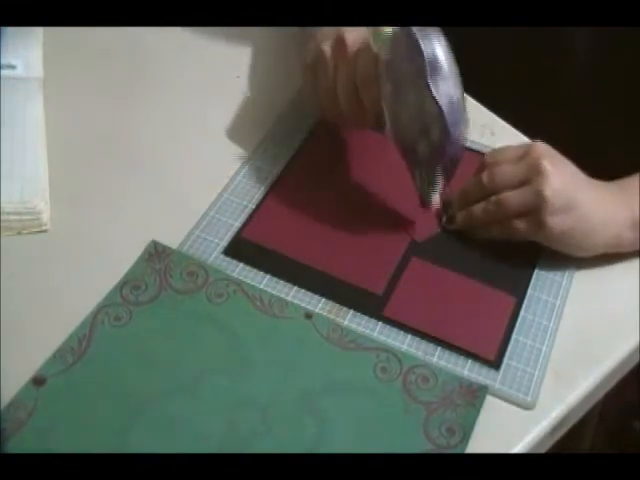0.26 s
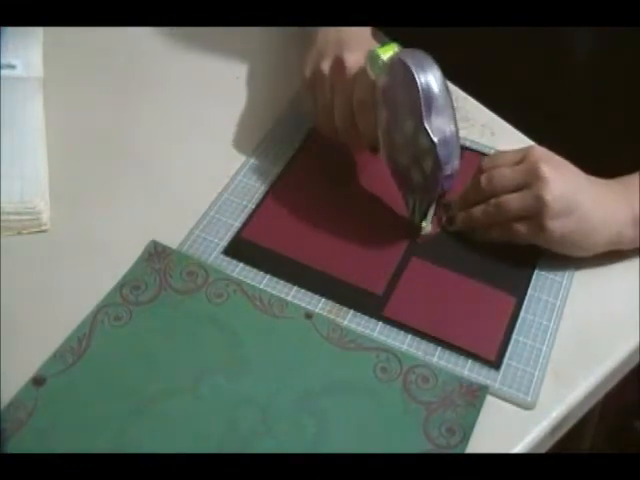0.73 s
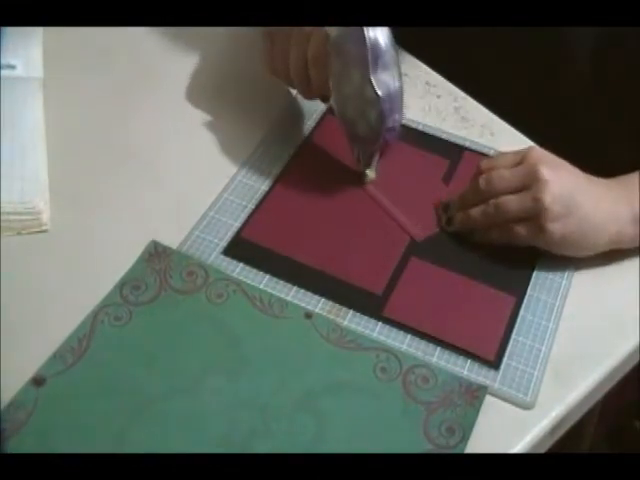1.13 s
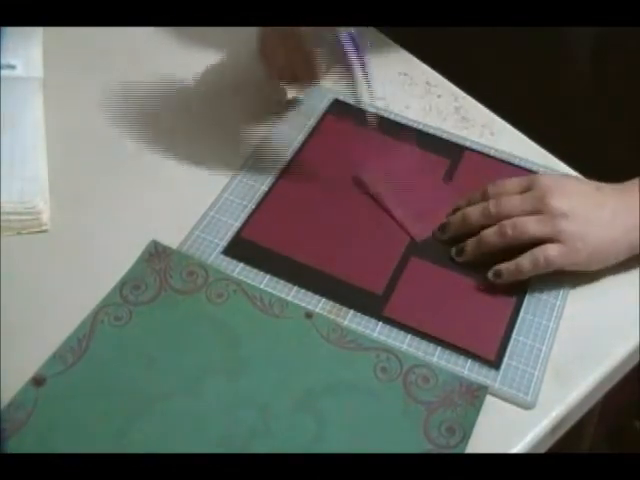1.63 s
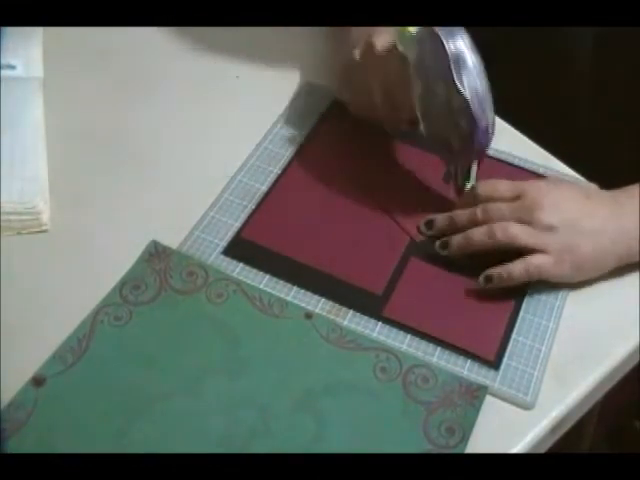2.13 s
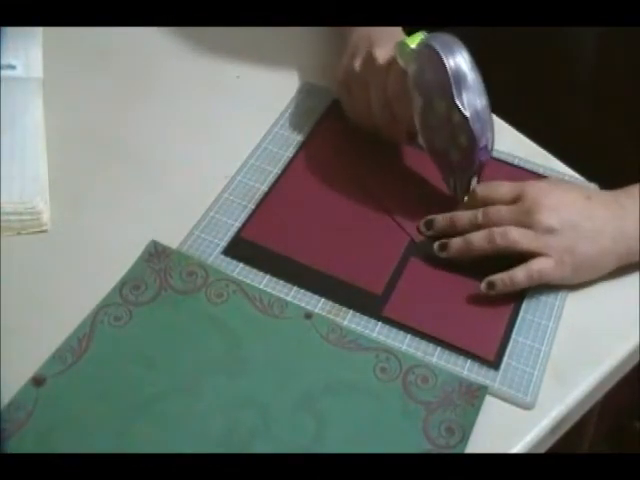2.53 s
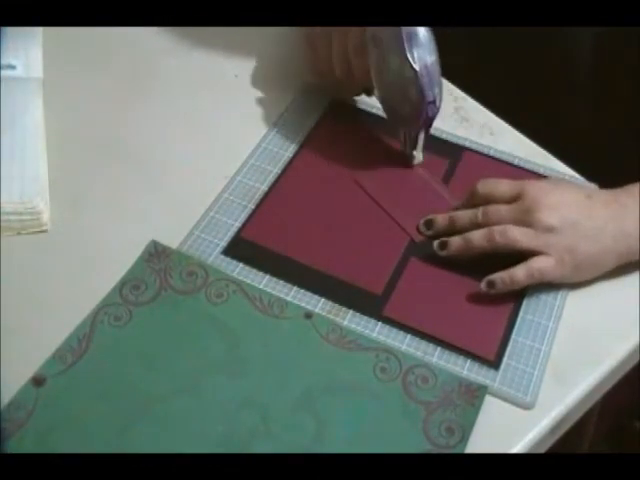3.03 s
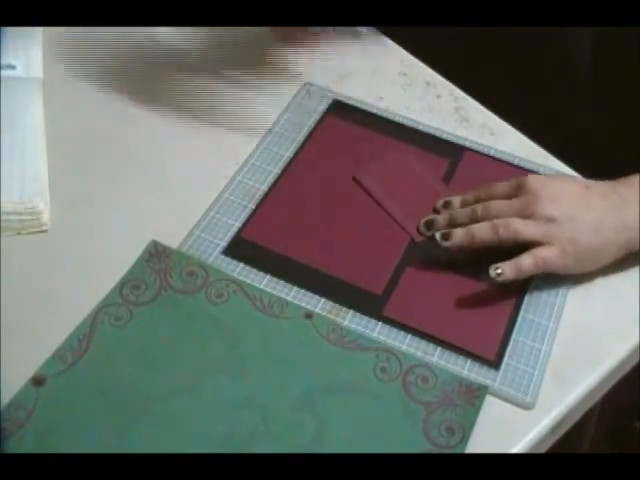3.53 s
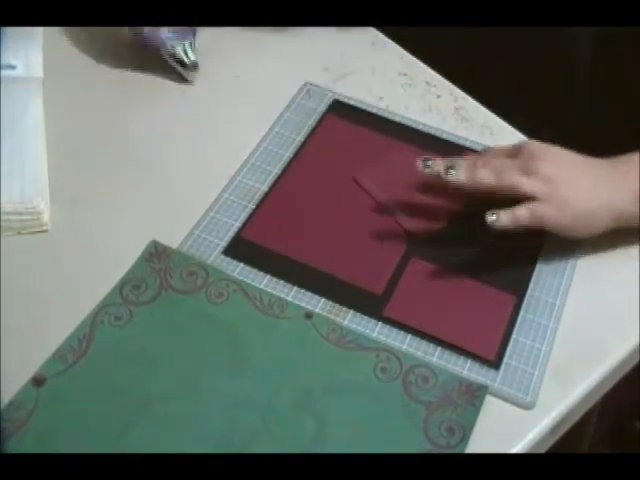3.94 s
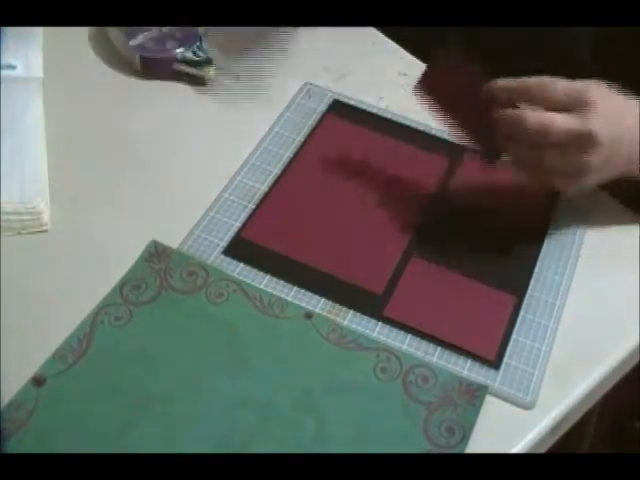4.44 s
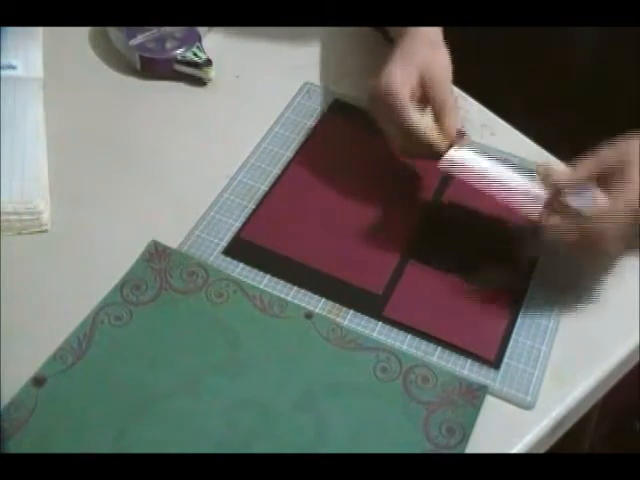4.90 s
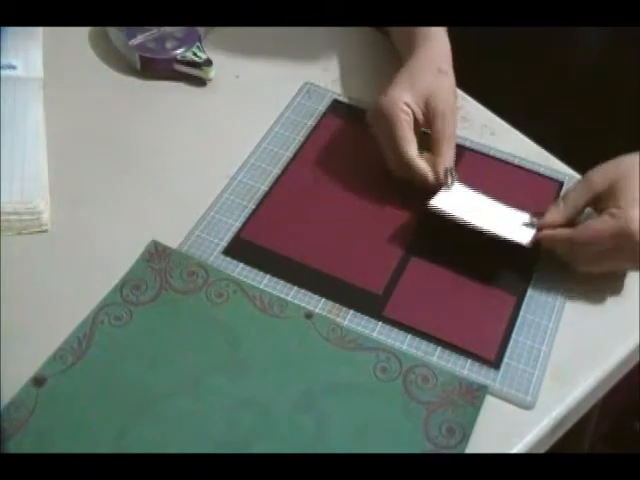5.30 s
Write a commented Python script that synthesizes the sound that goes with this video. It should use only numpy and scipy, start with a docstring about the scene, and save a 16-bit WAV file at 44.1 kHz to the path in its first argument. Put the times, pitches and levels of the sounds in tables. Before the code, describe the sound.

A small, quiet room with soft noise, a faint low hum beating about four times a second, and barely audible high, regular pips. Hands brush lightly on card from the start, with small ticks near 0.2 and 0.4 s. A soft double knock of plastic at 0.7 s leads into a tape pull from about 0.85 to 1.3 s: a gritty, ratcheting zip of rapid clicks with peel hiss, ending in a snap. A sharp plastic knock comes at 1.8 s, a tick at 2.25 and a double tap at 2.43. A faint squeak precedes the second, stronger pull, 2.8 to 3.2 s. Light rubs and ticks follow. From 4.0 to 4.4 s the runner clatters and scrapes onto the table, the loudest, hollow knocks slightly overloaded. A bright card snap at 4.65 s, then small ticks and rustles until a tiny squeak near 5.5 s. Close stereo, from the right.

```python
"""In a small room, a plastic tape runner is drawn twice over a piece of card on a cutting mat, then rocked and
put down on the table. Strokes are trains of stick-slip clicks that ring shell and table modes; single blows
ring the same modes as knocks. Filtered slips brush and rustle (hands on card, a stroke's first rasp);
ringing clicks snap and tick. Faint squeaks, leaning, motor and mains hum, timed pips and room noise lie around.
Two close microphone ports hear it from the right; the highest peaks overload them."""
import sys
import numpy as np
from scipy import signal
from scipy.fft import rfft, irfft
from scipy.io import wavfile

SR = 44100
rng = np.random.default_rng(int(sys.argv[2]) if len(sys.argv) > 2 else 0)


def dump_mix(stems):
    """Bounce the given channels to the path in sys.argv[1] as a 16-bit WAV at rate SR."""
    frames = np.atleast_2d(stems).T  # one column per channel
    limited = np.clip(frames, -1, 1)  # hard clip at full scale
    pcm = np.round(limited * 32767).astype(np.int16)
    wavfile.write(sys.argv[1], SR, pcm)


N = 245248

# Two tape strokes: t/s, pull level/dB, peel hiss over pull/dB (both before the layer trims)
STROKE_PULLS = [
    [(0.855, -49, -10), (0.895, -42, -3.5), (0.92, -46.5, -1.5), (0.972, -41, 0), (0.982, -33.5, -0.5),
     (1.025, -32.5, -2), (1.065, -34.5, -2.5), (1.115, -33, -9), (1.14, -36, 1), (1.195, -33, 1.5),
     (1.265, -48, -1.5), (1.3, -57, -6)],
    [(2.8, -52, -8), (2.83, -41.5, -8), (2.865, -39, -6), (2.92, -35.5, 0), (2.975, -27, -4),
     (3.005, -32.5, -4), (3.022, -37, 0.5), (3.05, -33, -3), (3.122, -37.5, -2.5), (3.15, -52.5, 1),
     (3.19, -65, 3)],
]
# Runner rocking and scraping: peak t/s, rise/s, fall/s, table rumble level/dB, shell level/dB, hiss level/dB
RUNNER_SLIDES = [(3.996, .003, .05, -68, -59, -56), (4.035, 0.012, 0.13, -51, -42, -41.5),
                 (4.1, 0.078, 0.12, -33.5, -29, -47.5), (4.175, 0.013, 0.084, -30.5, -57, -38.5),
                 (4.346, 0.045, 0.025, -26, -37, -38.5), (4.39, 0.028, 0.12, -28.5, -41.5, -38.5),
                 (4.435, 0.067, 0.036, -45, -72, -44)]
# Brushing and rustling, of hands on the card and of the rasp as the second stroke starts:
# peak t/s, rise/s, fall/s, dull rub level/dB, rustle level/dB, fine hiss level/dB
BRUSHING_SWELLS = [(0.05, 0.089, 0.19, -63, -57, -56.5), (0.165, .008, 0.092, -56, -55, -66),
                   (0.218, 0.099, 0.018, -46.5, -57, -55), (0.393, 0.026, 0.035, -47.5, -55.5, -52.5),
                   (0.73, 0.036, 0.12, -48, -67, -80), (0.76, 0.013, 0.027, -73, -58, -62),
                   (1.34, 0.093, 0.019, -71, -51, -49.5), (1.49, 0.061, 0.064, -78, -76, -52.5),
                   (1.72, 0.056, 0.024, -51.5, -53, -56), (1.83, 0.024, 0.028, -41.5, -46, -63),
                   (2.45, 0.016, 0.042, -42.5, -54, -56), (2.734, 0.087, 0.3, -57.5, -62, -83),
                   (2.835, 0.02, 0.055, -57, -40.5, -70), (3.298, 0.056, 0.15, -48.5, -62, -56.5),
                   (3.53, 0.044, 0.11, -46, -60, -56), (3.71, 0.084, 0.019, -55.5, -61, -54),
                   (4.645, 0.033, 0.013, -53, -53, -50), (4.68, 0.027, 0.053, -54, -50.5, -53),
                   (5.083, 0.011, 0.051, -75, -52, -67), (5.12, 0.09, 0.037, -73, -54, -57),
                   (5.32, 0.011, 0.085, -87, -63, -56), (5.38, 0.014, 0.024, -86, -58, -60)]
# Knocks of the runner: t/s, shell peak level/dB, table rms level/dB and crack rms level/dB (over 25 ms),
# table centre f/Hz, shell centre f/Hz, shell narrowness/(dB per octave squared), share of free ring time
RUNNER_KNOCKS = [(0.707, -38, -43.5, -70, 120, 750, 14, 0.95),
                 (0.715, -36.5, -42, -62, 132, 810, 3.5, 0.45),
                 (1.809, -52, -56, -42.5, 805, 2120, 15, 0.71), (1.8119, -19, -65, -43, 119, 1880, 28, 0.5),
                 (2.431, -29, -33.5, -45.5, 108, 830, 12, 0.88), (2.439, -31, -68, -70, 153, 754, 33, 0.93),
                 (4.018, -17, -26, -42, 296, 1080, 5, 0.8), (4.03, -20, -40, -55, 255, 750, 7, 0.4),
                 (4.059, -22, -29.5, -64, 258, 895, 3, 1), (4.1507, -9, -22, -32.5, 350, 760, 38, 0.28),
                 (4.163, -26, -24.5, -42.5, 231, 860, 20, 0.47),
                 (4.357, -9.5, -10.5, -30, 433, 1470, 19, 0.3), (4.395, -27, -20, -63, 397, 640, 5, 0.62)]
# Tape catching and letting go: t/s, shell peak level/dB, crack rms level/dB over 25 ms, shell centre f/Hz
TAPE_CATCHES = [(0.868, -31, -48, 970), (0.892, -26, -48, 1080), (0.934, -28, -50, 1080),
                (0.958, -27, -50, 1000), (0.979, -21, -39, 1040), (1.011, -23, -40, 1000),
                (1.024, -23, -42, 950), (1.137, -23, -38, 970), (1.187, -21.5, -38, 780),
                (1.219, -23, -45, 1000), (1.254, -28, -47.5, 870), (2.828, -27, -53, 900),
                (2.874, -21, -46, 950), (2.903, -27, -52, 850), (2.927, -18, -41, 900),
                (2.948, -20, -40, 1010), (2.974, -19, -41, 1040), (2.995, -23, -46, 1050),
                (3.039, -23, -43, 1080), (3.082, -21.5, -45, 980), (3.115, -24, -41, 1000)]
# Bright clicks, of card snaps and of sharp ticks at the second stroke's start and at runner knocks:
# t/s, peak level/dB, pitch f/Hz, rustle t60/s (at least 5 ms), ring over click/dB
BRIGHT_CLICKS = [(0.159, -30.5, 4070, 0.03, 3), (0.2112, -38, 2600, 0.02, 4), (0.392, -38.5, 3260, 0.2, -5),
                 (1.3202, -22, 1980, 0.015, -2), (2.2586, -29, 3300, 0.02, -5),
                 (2.821, -35, 3100, 0.05, -2), (2.843, -36, 3280, 0.04, -2), (3.67, -40, 1760, 0.079, -12),
                 (3.686, -25.5, 5450, 0.051, -12), (3.8283, -40, 2960, 0.16, -9),
                 (4.032, -30, 2850, 0.064, 1), (4.3982, -20.5, 2610, 0.052, -17),
                 (4.4247, -22, 2510, 0.017, 2), (4.625, -36.5, 2360, 0.028, -2),
                 (4.6564, -12, 3000, 0.013, -9.5), (4.664, -21.5, 2900, 0.045, -19),
                 (4.9885, -26.5, 2500, 0.051, -19), (5.081, -54, 1940, 0.26, 10),
                 (5.184, -40.5, 1520, 0.04, -4.5), (5.3613, -18.5, 1620, 0.02, -28)]
# Faint squeaks, one list per glide: t/s, pitch f/Hz, level/dB
SQUEAK_GLIDES = [
    [(2.69, 1180, -61), (2.745, 1156, -49.5), (2.8, 1070, -56)],
    [(2.68, 3100, -63), (2.72, 2840, -60), (2.77, 2680, -71)],
    [(5.525, 2960, -56), (5.54, 3500, -58), (5.556, 3380, -78)],
]
# An arm leaning on the table: peak t/s, rise/s, fall/s, level/dB
ARM_LEANS = [(0.15, 0.32, 0.24, -66), (1.14, 0.17, 0.14, -37.5), (1.58, 0.13, 0.083, -49.5),
             (1.72, 0.13, 0.086, -46.5), (2.15, 0.11, 0.049, -52.5), (3.03, 0.23, 0.19, -42.5)]
# Runner shell modes: f/Hz, relative level/dB, free t60/s
SHELL_MODES = [(664, -10, 0.034), (765, 0, 0.025), (872, 0.5, 0.055), (953, -1.5, 0.051),
               (1054, 5.5, 0.082), (1180, 7.5, 0.012), (1526, 13.5, 0.013), (1628, 14.5, 0.031),
               (1750, 9.5, 0.02), (2045, 11, 0.04), (2194, 10, 0.037), (2647, 21, 0.024),
               (2800, 20.5, 0.035), (3016, 18, 0.059), (3400, 15, 0.03)]
# Table top modes: f/Hz, relative level/dB, free t60/s
TABLE_MODES = [(65, -10, .15), (146, 2.5, .12), (170, -2, .11), (205, -3, .1), (232, 0, .1), (340, 0, .1),
               (395, 0, .07), (476, 0, .08), (528, -2, .07), (600, -2, .06), (700, -5, .05)]
# Colour of the peel hiss: f/Hz, relative level/dB
PEEL_COLOUR = [(760, -14), (1300, -8.5), (1710, -6), (2050, -3.5), (2880, -8.5), (3830, -12.5),
               (5830, -11.5), (7230, -9.5), (11000, -12.5), (14300, -10), (22000, -120)]
# Colour of the rustle and the scrape hiss: f/Hz, relative level/dB
RUSTLE_COLOUR = [(1200, 4.5), (1800, 6), (3000, 6), (5000, -5), (8000, -3), (11500, -11.5)]
# Colour of the dull rub: f/Hz, relative level/dB
RUB_COLOUR = [(400, -10), (700, 8.5), (950, 11), (1400, -2.5), (2000, -4)]
# Motor and mains lines: f/Hz, rms level/dB before the hum trim
HUM_LINES = [(58.01, -61), (116.03, -54), (120.03, -57), (179.73, -62), (232.8, -66)]
# Colour of the room noise: f/Hz, relative level/dB
AIR_COLOUR = [(15, -52), (25, -6.5), (118, -1), (160, -5), (401, -12), (1230, -22.5), (1510, -19),
              (2510, -25.5), (8100, -29.5), (11000, -31.5), (14300, -13), (22000, -120)]
# Likeness of the room noise in the two ports: f/Hz, likeness (held within 0.01 to 0.99 in use)
AIR_LIKENESS_CURVE = [(60, 0.88), (170, 0.87), (480, 0.72), (1370, 0.62), (3900, 0.32), (11100, -0.07)]
# Colour of direct sound at the left port: f/Hz, level/dB
LEFT_COLOUR = [(100, -1.5), (4500, -1.16), (7000, -7.5), (9500, -10), (11500, 1.5)]

LEFT_LAG_S = 5.5e-5


def strokes():
    """The tape peels in slips that shake the shell and, through the mat, the table; finer slips hiss."""
    walls_db, rasp_db, peel_db, rumble_db = -2.5, -8, 3, -13  # layer trims; the rasp follows the hiss
    on, spans = gains(STROKE_PULLS)
    pull = sum(o * from_db(db) for o, (db, _) in zip(on, spans))
    hiss = sum(o * from_db(db + over_db + peel_db) for o, (db, over_db) in zip(on, spans))
    peel = slips(per_s=2800, spread_db=2.0, clump_db=0.0)
    fine = slips(per_s=7600, spread_db=4.0, clump_db=1.0)
    walls = driven(from_db(walls_db) * pull, peel, SHELL_MODES[:6])
    rasp = driven(from_db(rasp_db) * hiss, peel, SHELL_MODES[7:])
    table = driven(from_db(rumble_db) * pull, peel, TABLE_MODES[1:3] + TABLE_MODES[5:8])
    return walls + rasp + hiss * rms_one(coloured(fine, closed(PEEL_COLOUR))) + table


def scrape():
    """Uneven contact of the rocking runner drives table and shell, over a more even hiss."""
    rumble, shell, hiss = swells(RUNNER_SLIDES)
    contact = slips(per_s=1600, spread_db=-2.0, clump_db=-1.0)
    fine = slips(per_s=12000, spread_db=3.5, clump_db=-2.0)
    bodies = driven(rumble, contact, TABLE_MODES) + driven(shell, contact, SHELL_MODES[:4])
    return bodies + hiss * rms_one(coloured(fine, closed(RUSTLE_COLOUR)))


def brushing():
    """Slips in three bands, a dull rub, a rustle and a fine hiss: hands on the card, and a stroke's first rasp."""
    resting_rub_db, resting_rustle_db, hiss_from_hz = -78, -70.5, 4730  # a hand stays on the card
    resting = from_db([[resting_rub_db], [resting_rustle_db], [resting_rustle_db]])
    rub, rustle, hiss = swells(BRUSHING_SWELLS) + resting
    fibres = slips(per_s=5000, spread_db=2.0, clump_db=2.5)
    crisp = coloured(fibres, closed(RUSTLE_COLOUR))
    low = signal.sosfilt(signal.butter(4, hiss_from_hz, "low", fs=SR, output="sos"), crisp)
    high = signal.sosfilt(signal.butter(4, hiss_from_hz, "high", fs=SR, output="sos"), crisp)
    dull = coloured(fibres, closed(RUB_COLOUR))
    return rub * rms_one(dull) + rustle * rms_one(low) + hiss * rms_one(high)


def knocks():
    """A blow strikes shell and table; where it lands picks the modes."""
    out, t = np.zeros(N + SR), np.arange(SR // 2) / SR
    for s, shell_db, table_db, crack_db, table_hz, shell_hz, narrow_db, ring_share in RUNNER_KNOCKS:
        force, crack = blow(t)
        # shell modes start against each other: a burst that swells
        shell = struck(force, SHELL_MODES, shell_hz, focus_db=narrow_db, ring_share=ring_share, sign=-0.88)
        # table modes start in step: a thud
        table = struck(force, TABLE_MODES, table_hz, focus_db=20.0, ring_share=ring_share, sign=0.89)
        bodies = from_db(shell_db) * shell + from_db(table_db) * head_one(table)
        add_at(out, s, bodies + from_db(crack_db) * crack)
    return out[:N]


def catches():
    """Each catch of the tape jolts the shell and cracks, leaving the table still."""
    out, t = np.zeros(N + SR), np.arange(SR // 4) / SR
    for s, shell_db, crack_db, shell_hz in TAPE_CATCHES:
        force, crack = blow(t)
        shell = struck(force, SHELL_MODES, shell_hz, focus_db=14, ring_share=.3, sign=-.4)
        add_at(out, s, from_db(shell_db) * shell + from_db(crack_db) * crack)
    return out[:N]


def bright_clicks():
    """Card snaps and sharp ticks: a wide click and a dying rustle, both ringing at one broad pitch."""
    out, t = np.zeros(N + SR), np.arange(SR // 4) / SR
    for s, db, hz, t60, ring_db in BRIGHT_CLICKS:
        force = 0.32 * rng.standard_normal(len(t)) * from_db(-60 * t / max(t60, .005))
        force[0] = 1
        above = signal.lfilter(*signal.butter(2, hz / 1.5, "high", fs=SR), force)
        pitched = ring(above, hz, 3.4 / hz)
        add_at(out, s, from_db(db) * peak_one(above + from_db(ring_db) * pitched))
    return out[:N]


def squeaks():
    """Short breathy glides: a tone and narrow noise carried on a sliding pitch."""
    clear_tone, breath_width = .7, .045  # tone amplitude; noise width as a share of the first pitch
    t, out = np.arange(N) / SR, 0
    for rows in SQUEAK_GLIDES:
        s, hz, db = np.transpose(rows)
        phase = 2 * np.pi * np.cumsum(np.interp(t, s, hz)) / SR
        width_hz = breath_width * hz[0]
        in_phase = (clear_tone + drift(width_hz)) * np.sin(phase)
        across = drift(width_hz) * np.cos(phase)
        out = out + from_db(np.interp(t, s, db, -200, -200)) * (in_phase + across)
    return out


def leans():
    """Soft weight on the table, as swelling noise, stirs its deepest modes."""
    level, = swells(ARM_LEANS)
    return driven(level, rng.standard_normal(N), TABLE_MODES[:5])


def hum():
    """Motor and mains lines near 116 and 120 Hz beat four times a second; each line wavers a little."""
    in_step_s, trim_db = 0.065, -0.5  # moment when all lines crest together; trim on every line
    t, out = np.arange(N) / SR - in_step_s, 0
    for hz, db in HUM_LINES:
        level = from_db(db + trim_db + 0.13 * drift(0.54))
        out = out + np.sqrt(2) * level * np.cos(2 * np.pi * hz * t)
    return out


def pips():
    """Faint soft tone bursts keep even time, uneven in strength."""
    pip_hz, typical_db, every_s = 4030, -68, .1
    t = np.arange(N) / SR
    beat = np.round(t / every_s)
    strength = from_db(typical_db + 3 * rng.standard_normal(60))[beat.astype(int)]
    bell = np.exp(-((t - beat * every_s) / 0.01) ** 2)
    return strength * bell * np.sin(2 * np.pi * pip_hz * t)


def room(x):
    """Dense echoes dying away; the ports share the low ones and differ in the high ones."""
    room_t60_s, room_db, wall_cut_hz = 0.24, -8.5, 22000
    nearby_t60_s, nearby_db = 0.049, 3.5  # things on the table scatter first
    t = np.arange(SR // 2) / SR
    decay = from_db(-60 * t / room_t60_s) + from_db(nearby_db - 60 * t / nearby_t60_s)
    fade_in = np.minimum(t / 0.002, 1)
    low, left, right = rng.standard_normal((3, SR // 2)) * decay * fade_in
    under, over = (signal.butter(1, 1800, kind, fs=SR) for kind in ("low", "high"))
    echoes = [signal.lfilter(*under, low) + signal.lfilter(*over, own) for own in (left, right)]
    echoes = signal.lfilter(*signal.butter(1, [200, wall_cut_hz], "band", fs=SR), echoes)
    echoes = from_db(room_db) * rms_one(echoes) / np.sqrt(len(t))
    return signal.fftconvolve(x[None], echoes, axes=1)[:, :N]


def air():
    """Room noise, drifting in level: alike in both ports in the bass, unrelated in the treble."""
    shared, left, right = rng.standard_normal((3, N))
    likeness = [(hz, np.clip(c, .01, .99)) for hz, c in AIR_LIKENESS_CURVE]
    same = [(hz, 10 * np.log10(c)) for hz, c in likeness]
    own = [(hz, 10 * np.log10(1 - c)) for hz, c in likeness]
    left = coloured(shared, same, LEFT_LAG_S) + coloured(left, own)
    right = coloured(shared, same) + coloured(right, own)
    pair = np.array([coloured(x, AIR_COLOUR) for x in (left, right)]) * from_db([[-.4], [.4]])
    return from_db(-50 + 1.8 * drift(0.79)) * rms_one(pair)


def blow(t):
    """One click with a sparse rattle behind it, and the bright crack that it makes."""
    rattle = 0.15 * rng.standard_normal(len(t)) * np.exp(-t / 0.0079)
    force = rattle * (rng.random(len(t)) < .05)
    force[0] = -1
    spray = .16 * rng.standard_normal(len(t)) * from_db(-60 * t / .06)
    bright = signal.butter(1, [1700, 6000], "band", fs=SR)
    return force, head_one(signal.lfilter(*bright, force + spray))


def struck(force, modes, centre_hz, focus_db, ring_share, sign):
    """Modes near the centre answer most; a hand on the body shortens rings; little radiates far off centre."""
    chance_db = rng.normal(0, 3.1, len(modes))
    rings = 0
    for k, (hz, db, t60) in enumerate(modes):
        off_centre_db = focus_db * np.log2(hz / centre_hz) ** 2
        gain = sign ** k * from_db(db - off_centre_db + chance_db[k])
        rings = rings + gain * ring(force, hz, t60 * ring_share)
    band = signal.butter(2, [centre_hz / 2, centre_hz * 2], "band", fs=SR, output="sos")
    return peak_one(signal.sosfilt(band, rings))


def slips(per_s, spread_db, clump_db):
    """Stick and slip: random clicks of uneven size, whose level can swell in clumps; rms 1."""
    sizes = from_db(spread_db * np.minimum(rng.exponential(1, N), 5)) * rng.choice([-1, 1], N)
    clicks = sizes * (rng.random(N) < per_s / SR)
    return rms_one(clicks * from_db(clump_db * drift(47)))


def driven(level, force, modes):
    """A body driven around the given rms level, ringing on after the force stops."""
    return body(level * force, modes) / np.std(body(force, modes))


def body(force, modes):
    """All modes of a body driven together, signs alternating."""
    return sum((-1) ** k * from_db(db) * ring(force, hz, t60) for k, (hz, db, t60) in enumerate(modes))


def ring(force, hz, t60):
    """A two-pole resonator: a unit click sets a decaying sine ringing from height 1."""
    r, w = from_db(-60 / (t60 * SR)), 2 * np.pi * hz / SR
    return signal.lfilter([0, np.sin(w)], [1, -2 * r * np.cos(w), r * r], force + 1e-18)


def swells(rows):
    """Each row rises to its peak and falls away, straight in dB; one gain in time per level column."""
    swell_db = 20  # gained over a rise, lost over a fall
    t, out = np.arange(N) / SR, 0
    for s, rise, fall, *db in rows:
        away = np.where(t < s, (s - t) / max(rise, .002), (t - s) / max(fall, .002))
        out = out + from_db(db)[:, None] * from_db(-swell_db * np.minimum(away, 8))
    return out


def gains(spans):
    """When each span sounds, and its columns drawn out in time."""
    t = np.arange(N) / SR
    columns = [np.transpose(span) for span in spans]
    on = [(t >= s[0]) & (t <= s[-1]) for s, *_ in columns]
    return on, [[np.interp(t, s, c) for c in cols] for s, *cols in columns]


def drift(rate):
    """Random wander, rms 1: noise through two equal low-pass poles at the rate in Hz."""
    r = np.exp(-2 * np.pi * rate / SR)
    return rms_one(signal.lfilter([1], [1, -2 * r, r * r], rng.standard_normal(N + SR))[SR:])


def coloured(x, spectrum, lag_s=0):
    """x shaped by a spectrum table and delayed."""
    hz = np.fft.rfftfreq(N, 1 / SR)
    lag = np.exp(-2j * np.pi * hz * lag_s)
    return irfft(rfft(x) * from_db(at_hz(spectrum, hz)) * lag, N)


def closed(spectrum):
    """The same spectrum falling to -60 dB an octave past both ends."""
    return [(spectrum[0][0] / 2, -60), *spectrum, (spectrum[-1][0] * 2, -60)]


def at_hz(points, hz):
    """A spectrum table read on a log-frequency axis."""
    table_hz, table_db = np.transpose(points)
    return np.interp(np.log(np.maximum(hz, 1)), np.log(table_hz), table_db)


def add_at(out, s, sound):
    """Lay a sound into the track at s seconds."""
    i = round(s * SR)
    out[i:i + len(sound)] += sound


def from_db(db):
    """Decibels to gain."""
    return 10 ** (np.asarray(db) / 20)


def rms_one(x):
    """Scaled to rms 1."""
    return x / np.sqrt(np.mean(x ** 2) + 1e-20)


def head_one(x):
    """Scaled to rms 1 over the first 25 ms."""
    return x / np.sqrt(np.mean(x[:SR // 40] ** 2))


def peak_one(x):
    """Scaled to a highest swing of 1."""
    return x / np.abs(x).max()


def scene():
    """Direct sounds reach the right port first; the left one is duller, most of all from 7 to 10 kHz."""
    near = strokes() + scrape() + brushing() + knocks() + catches() + bright_clicks() + squeaks() + leans()
    direct = near + hum() + pips()
    ports = np.array([coloured(direct, LEFT_COLOUR, LEFT_LAG_S), direct])
    return ports + room(near) + air()


def record(dry):
    """The ports lose deep bass, flatten peaks towards the overload level and cut the top."""
    overload, cutoff_hz = .5, 11700
    thin = signal.sosfilt(signal.butter(2, 40, "high", fs=SR, output="sos"), dry)
    flat = thin / (1 + np.abs(thin / overload) ** 8) ** (1 / 8)
    # the stop band, 50 dB down, starts just above the cutoff
    return signal.sosfilt(signal.cheby2(14, 50, cutoff_hz * 1.018, fs=SR, output="sos"), flat)


dry = scene()
out = record(dry)
dump_mix(out)
```